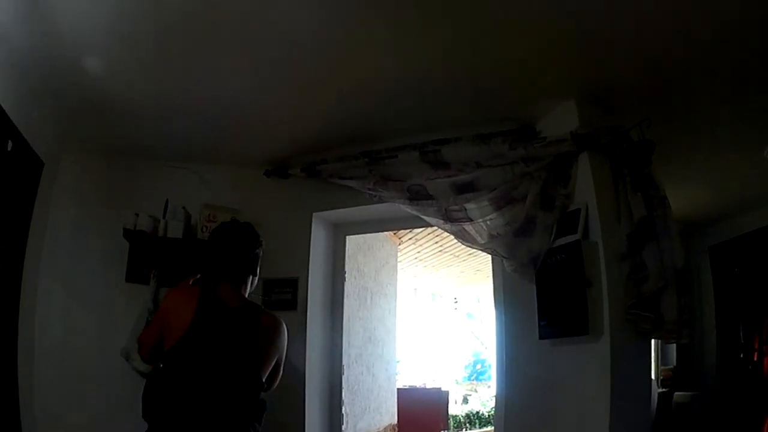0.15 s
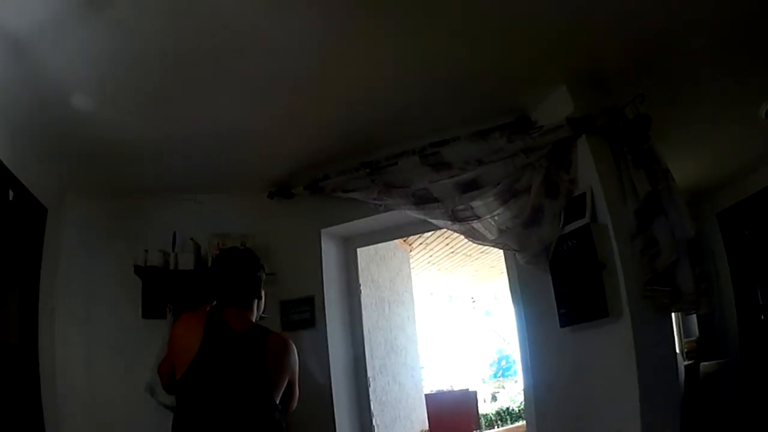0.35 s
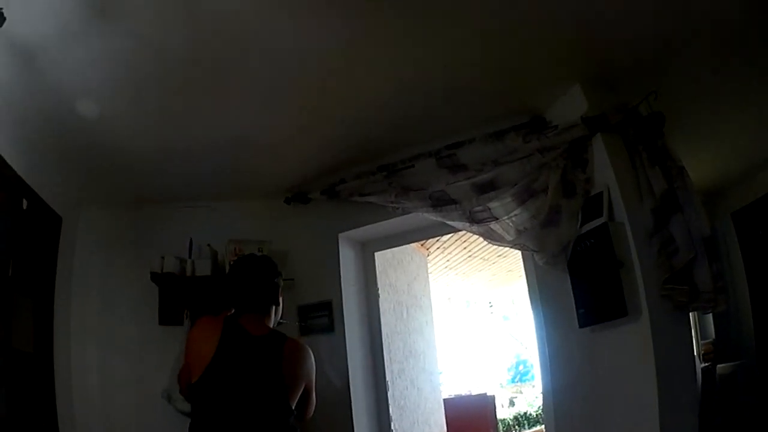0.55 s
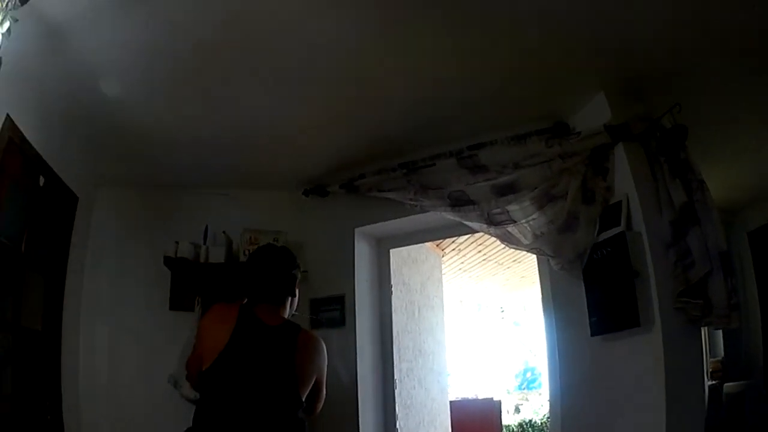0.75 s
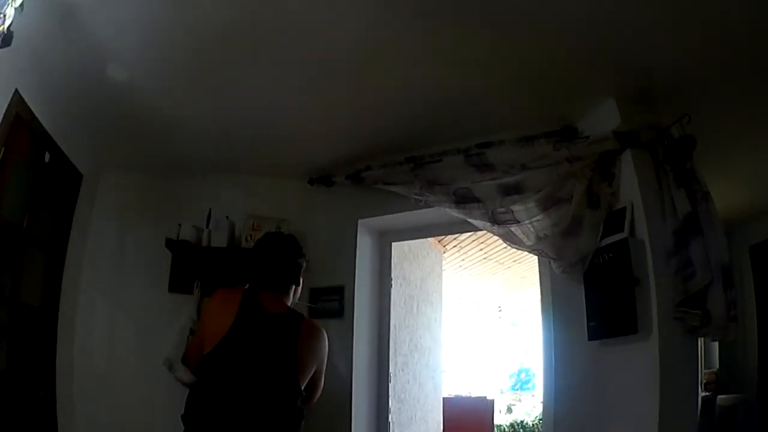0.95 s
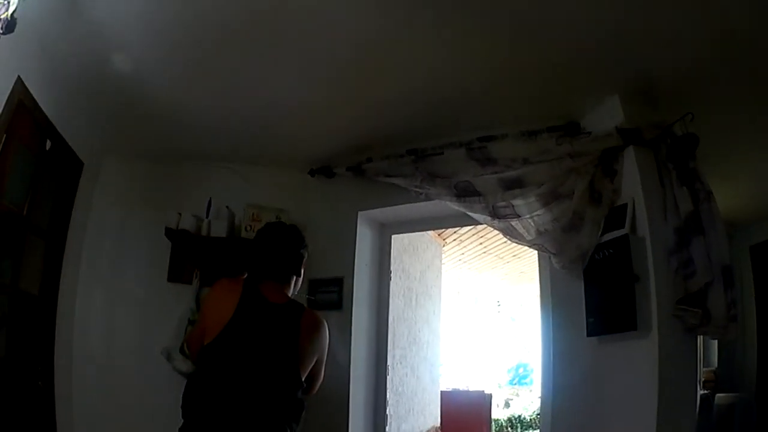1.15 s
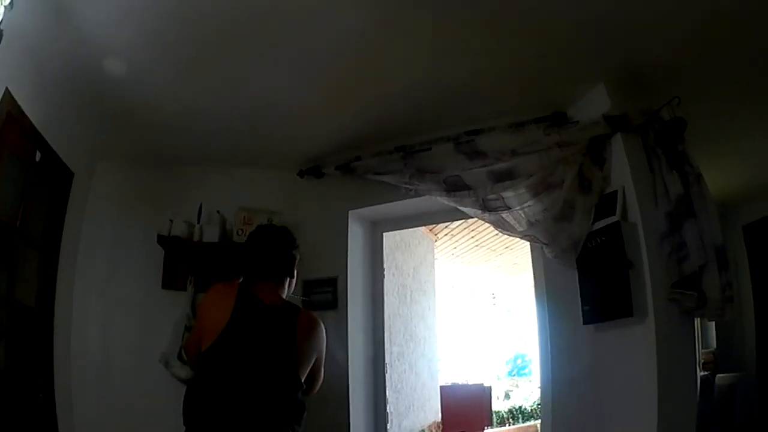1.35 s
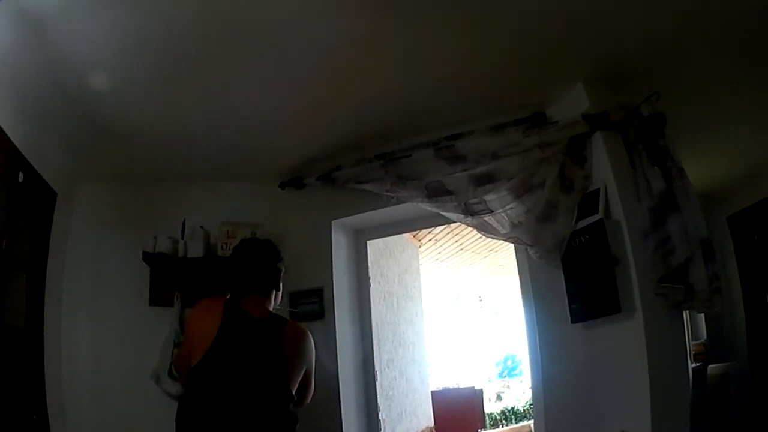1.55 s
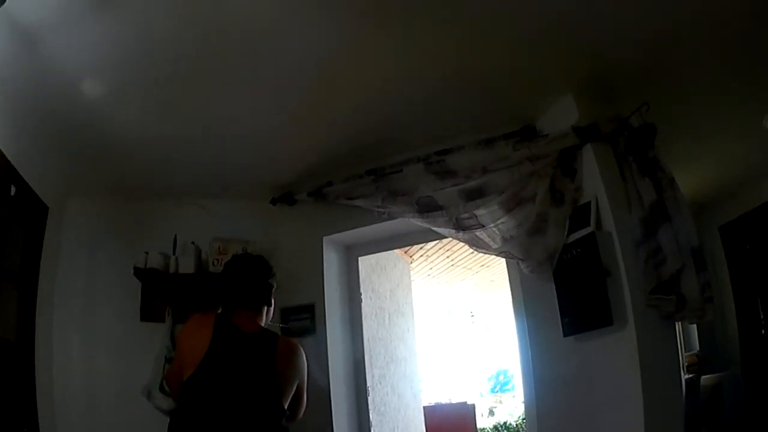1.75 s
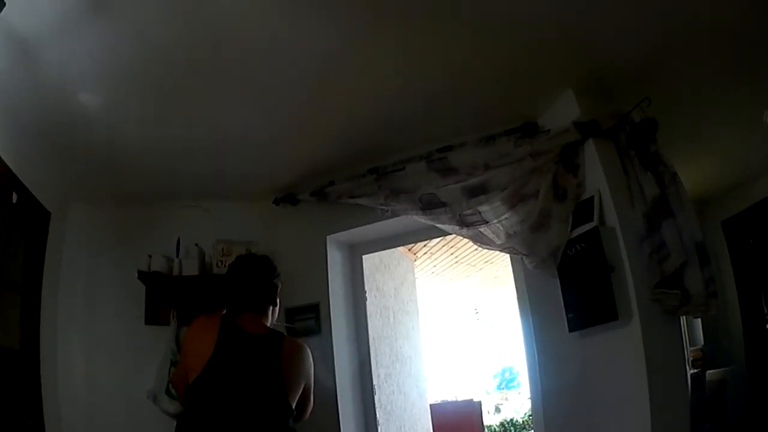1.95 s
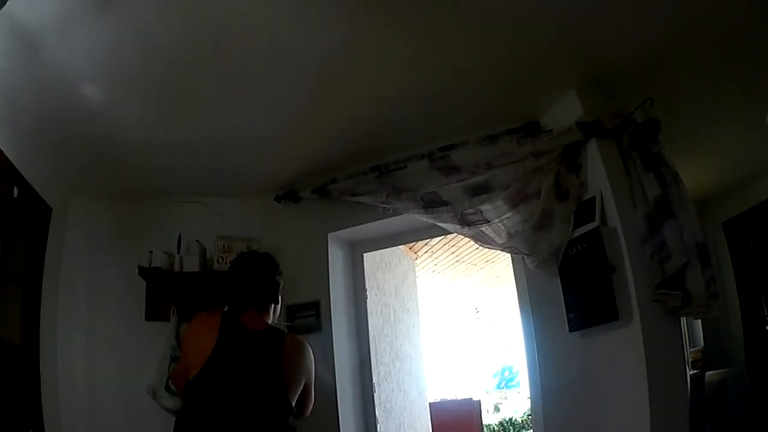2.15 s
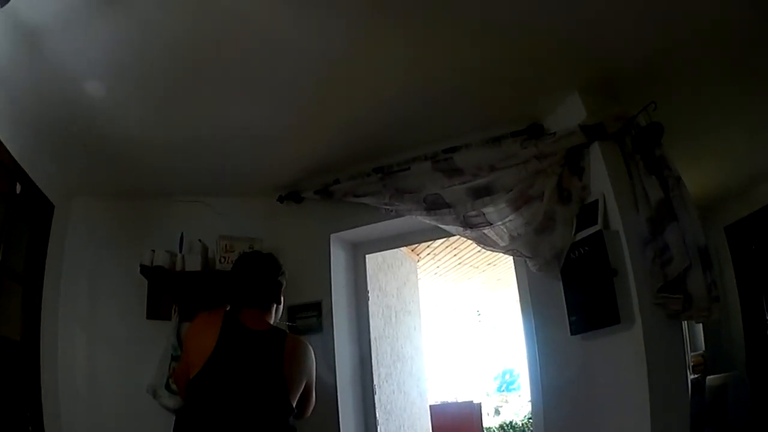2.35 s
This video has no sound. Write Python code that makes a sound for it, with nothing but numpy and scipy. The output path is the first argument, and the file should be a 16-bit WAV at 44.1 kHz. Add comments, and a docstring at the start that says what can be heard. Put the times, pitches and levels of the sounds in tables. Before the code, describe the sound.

After half a second of soft outdoor rush through an open door, a hammer drill bites into a masonry wall, hammering in three loud surges with grinding and squealing, close in a bare echoing room.

```python
"""A soft outdoor rush comes through an open door, then a hammer drill bores into a masonry wall in a bare room.
The trigger is squeezed in three surges: the hammer goes from single taps to a rattle and coasts down again.
Each blow is a click that cracks the stone, rings the steel bit and keeps the wall humming.
Gears grind (filtered grit) and whirr (a gliding tone), and the bit squeals (a resonance kept going by noise).
The rush, shaped noise, carries on softly underneath."""
import sys
import numpy as np
from scipy import signal
from scipy.fft import rfft, irfft, next_fast_len
from scipy.io import wavfile
from scipy.ndimage import uniform_filter1d

SR = 44100
rng = np.random.default_rng(int(sys.argv[2]) if len(sys.argv) > 2 else 0)


def store_wav(level_fs):
    """Save 16-bit WAV to argv[1]."""
    pcm = np.round(np.clip(np.atleast_2d(level_fs), -1, 1) * 32767)
    wavfile.write(sys.argv[1], SR, pcm.T.astype(np.int16))


N = 110250  # length in samples: 2.5 s


def from_db(db):
    """Turn decibels into a gain."""
    return 10 ** (np.asarray(db) / 20)


def rms_one(x):
    """Scale a sound to an rms of 1."""
    return x / np.sqrt(np.mean(x ** 2) + 1e-20)


def in_time(rows, **ends):
    """Draw straight lines between the rows of a table to get a value at every sample."""
    return np.interp(np.arange(N) / SR, *np.transpose(rows), **ends)


def at_hz(points, hz):
    """Read a spectrum at any frequency, with straight lines on a log-frequency axis."""
    point_hz, values = np.transpose(points)
    return np.interp(np.log(hz + 1e-3), np.log(point_hz), values)


def colour(x, spectrum):
    """Filter a sound by a spectrum given in dB."""
    size = next_fast_len(N + 8192)  # spare room keeps the end from wrapping to the start
    gain = from_db(at_hz(spectrum, np.fft.rfftfreq(size, 1 / SR)))
    return irfft(rfft(x, size) * gain, size)[..., :N]


def low_pass(x, hz):
    """Gently remove what lies above a frequency."""
    return signal.sosfilt(signal.butter(2, hz, fs=SR, output="sos"), x)


def drift(rate_hz):
    """Make a slow random wander with an rms of 1."""
    settled = low_pass(rng.standard_normal(N + SR), rate_hz)[SR:]
    return rms_one(settled)


def ring(drive, hz, t60):
    """Let a sound set one resonance ringing, dying by 60 dB in t60 seconds; rms 1."""
    radius = from_db(-60 / (t60 * SR))  # how much of the ring survives each sample
    angle = 2 * np.pi * hz / SR
    feedback = [1, -2 * radius * np.cos(angle), radius * radius]
    return rms_one(signal.lfilter([1, 0, -1], feedback, drive + 1e-18))


# How alike the left and right channels are.
# Each row: frequency in Hz, likeness from -1 (opposite) through 0 (unrelated) to 1 (the same).
LEFT_RIGHT_LIKENESS = [(60, 1), (200, 0.92), (620, 0.96), (1360, 0.84), (2970, 0.62), (4200, 0.59),
                       (6500, -0.28), (8500, -0.16), (13000, -.1)]


def diffuse_noise(size):
    """Sound from all around: stereo noise nearly alike in the bass and less so in the treble."""
    mid, side = rfft(rng.standard_normal((2, size)))
    alike = np.clip(at_hz(LEFT_RIGHT_LIKENESS, np.fft.rfftfreq(size, 1 / SR)), -.99, .99)
    return irfft(np.sqrt(1 + alike) * mid + np.sqrt(1 - alike) * side * [[1], [-1]], size)


ROOM_T60_S, TREBLE_T60_S = 0.6, 0.4  # time to die by 60 dB, below and above about 4500 Hz
EARLY_S, EARLY_DB = 0.013, 1  # decay time and extra level of the near reflections
ECHO_RISE_S = 0.0015  # the near reflections take a moment to build up
DIRECT_DB = -9  # direct sound against the echoes


def room_response():
    """Bare walls give direct sound, near reflections, and a tail whose treble dies first."""
    t = np.arange(SR) / SR
    noise = diffuse_noise(SR)
    low = irfft(rfft(noise) / (1 + (np.fft.rfftfreq(SR, 1 / SR) / 4500) ** 4), SR)
    high = noise - low
    tail = low * from_db(-60 * t / ROOM_T60_S) + high * from_db(-60 * t / TREBLE_T60_S)
    near = 1 + from_db(EARLY_DB) * np.exp(-t / EARLY_S)
    echoes = tail * near * (1 - np.exp(-t / ECHO_RISE_S))
    direct = from_db(DIRECT_DB) * (t == 0)
    return echoes / np.sqrt(np.sum(echoes ** 2) / 2) + direct


def in_room(x):
    """Play a sound in the room by convolving it with fresh echoes; rms 1."""
    return rms_one(signal.fftconvolve(np.atleast_2d(x), room_response(), axes=1)[:, :N])


# Tone of the outdoor rush. Each row: frequency in Hz, relative strength in dB.
OUTDOORS_COLOUR = [(25, 0), (60, -5), (100, -12.5), (160, -7.5), (280, -6), (450, -6), (800, -7.5),
                   (950, -2.5), (1200, -3.5), (2000, -13), (3500, -20), (5500, -31), (7200, -28.5),
                   (8200, -36), (11000, -40), (14000, -58.5)]
# Rise and fall of the outdoor rush. Each row: time in seconds, relative level in dB.
OUTDOORS_SWELL = [(0.0, -51), (0.306, -49), (0.54, -49.5)]
OUTDOORS_DB = 7  # added to the whole swell


def outdoors():
    """Shaped noise makes a soft rush from beyond the open door."""
    rush = rms_one(colour(diffuse_noise(N), OUTDOORS_COLOUR))
    return from_db(OUTDOORS_DB + in_time(OUTDOORS_SWELL)) * rush


# Loudness of the grinding and whirr. Each row: time in seconds, relative level in dB.
GRIND_LEVEL = [(0.55, -60), (0.56, -48.5), (0.652, -24), (0.734, -15.5), (0.94, -15.5), (1.19, -27.5),
               (1.358, -11), (1.37, -14), (1.488, -16), (1.532, -18), (1.56, -14.5), (1.836, -25),
               (1.94, -15.5), (2.292, -15), (2.444, -22), (2.5, -22.5)]


def grind_level_db():
    """The grinding and the whirr share one loudness curve, silent before the start."""
    return in_time(GRIND_LEVEL, left=-120)


WHIRR_CYCLES_PER_BLOW, WHIRR_DB = 89, -12.5  # the level is added to the shared curve
WANDER_CYCLES, WANDER_HZ = 0.63, 31.1  # unsteadiness of the tone, and the top of its rates


def whirr(turns):
    """Gears make a rough tone that glides with the speed and smears in the room."""
    cycles = WHIRR_CYCLES_PER_BLOW * turns + WANDER_CYCLES * drift(WANDER_HZ)
    tone = np.sin(2 * np.pi * cycles)
    return from_db(WHIRR_DB + grind_level_db()) * in_room(tone * (turns > 0))


GRIT_PER_S, GRIT_SPREAD_DB = 1500, 3


def grit():
    """Grinding is made of dense tiny contacts of uneven size."""
    contacts = rng.random(N) < GRIT_PER_S / SR
    return contacts * rng.standard_normal(N) * from_db(GRIT_SPREAD_DB * rng.standard_normal(N))


# Tone of the grinding. Each row: frequency in Hz, relative strength in dB.
GRIND_TONE = [(30, -31), (110, -23.5), (330, -19), (480, -12.5), (660, -3), (800, -3.5), (1050, -8),
              (1700, 0.5), (2250, 2), (3000, -0.5), (3900, -0.5), (5600, -11.5), (7200, -17), (9000, -23),
              (12300, -29), (13000, -39)]
GRIND_DB = -1  # added to the shared curve
GRIND_PULSE = 0.065  # depth of the throb at each blow
HOUSING_HZ, HOUSING_FOLLOWS = 1180, 0.8  # top of the growl, and its share of the level swings
SPIN_UP_TURNS = 0.26  # the grinding sets in over the first part of a turn


def grinding(turns, count=3):
    """Several layers of the same throbbing grit, each with its own echoes, over a steadier low growl."""
    throb = 1 + GRIND_PULSE * np.cos(2 * np.pi * turns)
    layers = sum(in_room(grit() * throb) for _ in range(count))
    sound = rms_one(colour(layers, GRIND_TONE))
    # Filtering forwards, then backwards, leaves the growl without delay.
    growl = low_pass(low_pass(sound, HOUSING_HZ)[:, ::-1], HOUSING_HZ)[:, ::-1]
    level_db = grind_level_db()
    growl_db = level_db.max() + HOUSING_FOLLOWS * (level_db - level_db.max())
    spin_up = np.clip(turns / SPIN_UP_TURNS, 0, 1) ** .5
    mix = (sound - growl) * from_db(level_db) + growl * from_db(growl_db)
    return from_db(GRIND_DB) * spin_up * mix


# Loudness of the bit's squeal as it rubs in the hole. Each row: time in seconds, level in dB.
SQUEAL_SWELL = [(.6, -80), (.76, -24.5), (.85, -22), (1.0, -36), (1.2, -58), (1.35, -22.5), (1.48, -18.5),
                (1.6, -41), (1.85, -52), (2.0, -22), (2.17, -21), (2.27, -20), (2.36, -45), (2.5, -32)]
SQUEAL_HZ, SQUEAL_T60_S = 3885, 0.019  # the ring time is split over two passes
SQUEAL_THROB = 0.46  # depth of the flutter


def squeal(turns):
    """Rubbing noise keeps a strong mode of the bit ringing, fluttering once per blow."""
    rub = diffuse_noise(N) * (1 + SQUEAL_THROB * np.sin(2 * np.pi * turns))
    once = ring(rub, SQUEAL_HZ, SQUEAL_T60_S / 2)
    twice = ring(once, SQUEAL_HZ, SQUEAL_T60_S / 2)
    return from_db(in_time(SQUEAL_SWELL)) * twice


def blow_times(turns):
    """The hammer strikes once per turn; gives the sample positions."""
    return np.flatnonzero(np.diff(np.floor(turns)) > 0)


def strikes(at, db, spread_db):
    """Each blow is a click, randomly a little stronger or weaker."""
    clicks = np.zeros(N)
    clicks[at] = from_db(db + spread_db * rng.standard_normal(len(at)))
    return clicks


CHATTER_S, CHATTER_DB = 0.0038, -11  # decay time, and level against the click


def chatter(clicks):
    """The bit rebounds and stone crumbles: a short burst of fading noise after each blow."""
    fading = signal.lfilter([1], [1, -np.exp(-1 / (CHATTER_S * SR))], clicks + 1e-18)
    return clicks + from_db(CHATTER_DB) * fading * rng.standard_normal(N)


def even(x):
    """Level out a sound by dividing it by its own short-term loudness."""
    return x / np.sqrt(np.abs(uniform_filter1d(x ** 2, size=3000)) + 1e-2)


RING_SPREAD_DB = 3.5  # random spread of the blows that ring the wall and bit

# Ringing of the wall. Each row: frequency in Hz, relative level in dB, time to die by 60 dB in seconds.
WALL_RINGING = [(117.7, -18, 0.19), (149.4, -13.5, 0.49), (211.2, -6.5, 0.47), (214.4, -1.5, 0.29),
                (234.3, -9, 0.45), (284, -15, 0.46), (340.5, -14, .3), (379.3, -13.5, 0.24),
                (481, -7, 0.75)]
# Loudness of the wall's hum. Each row: time in seconds, relative level in dB.
WALL_SWELL = [(.55, -80), (.65, -60.5), (.72, -34), (.9, -40), (1.02, -41.5), (1.12, -47.5), (1.22, -45),
              (1.28, -48), (1.34, -35), (1.58, -33.5), (1.68, -37.5), (1.82, -53), (1.92, -34), (2.07, -36),
              (2.3, -33.5), (2.5, -43)]


def wall(turns):
    """Blows keep the wall's low modes humming, each mode held nearly even."""
    at = blow_times(turns)
    hum = np.zeros(N)
    for hz, level_db, t60 in WALL_RINGING:
        clicks = chatter(strikes(at, 0, RING_SPREAD_DB))
        hum += from_db(level_db) * even(ring(clicks, hz, t60))
    return from_db(in_time(WALL_SWELL)) * hum


# Strength of the blows. Each row: time in seconds, relative strength in dB.
BLOW_FORCE = [(.637, -27.5), (.686, -7), (.72, 1.5), (.75, 1), (.82, -5.5), (.91, -3), (1.04, -23.5),
              (1.1, -16.5), (1.19, -20), (1.25, -11.5), (1.33, -0.5), (1.39, -1.5), (1.48, -2.5),
              (1.62, -8.5), (1.7, -16.5), (1.78, -20.5), (1.84, -18), (1.89, -6), (1.95, 1), (2.0, -3),
              (2.15, -4), (2.26, -6), (2.41, -22), (2.49, -11.5)]
# Tone of the cracking stone. Each row: frequency in Hz, relative strength in dB.
CRACK_COLOUR = [(30, -65), (100, -46), (400, -37), (1000, -6.5), (2200, -6), (3900, 2), (5700, -7.5),
                (7200, -3), (9200, -8), (12300, -12), (12700, -14.5)]
# Ringing of the steel bit and chuck. Each row: frequency in Hz, relative level in dB,
# time to die by 60 dB in seconds, left minus right in dB before the room.
BIT_RINGING = [(2228, 0.5, 0.027, 1.5), (3880, 0.5, 0.033, 4), (3710, -2, 0.022, 11),
               (5130, -5.5, 0.037, 5), (5920, -20, 0.017, -10), (6563, -16, 0.012, -36.5),
               (7300, -5, 0.017, -13.5), (8290, -7, 0.045, 8), (9800, -10, 0.034, 5.5),
               (10000, -23, 0.019, -2), (10670, -5, .02, -4.5), (11976, -13.5, .025, 17),
               (12100, -20, .025, 6)]
CRACK_DB, BIT_DB = -21.5, -23.5  # rms levels
BLOW_SPREAD_DB = 4.5  # random spread of the cracks


def hammer(turns):
    """Each blow cracks the stone and sets the steel bit's modes ringing."""
    at = blow_times(turns)
    force_db = in_time(BLOW_FORCE)[at]
    crack = colour(chatter(strikes(at, force_db, BLOW_SPREAD_DB)), CRACK_COLOUR)
    bit = np.zeros((2, N))
    for hz, level_db, t60, left_minus_right_db in BIT_RINGING:
        sides_db = level_db + np.array([[.5], [-.5]]) * left_minus_right_db
        clicks = chatter(strikes(at, force_db, RING_SPREAD_DB))
        bit += from_db(sides_db) * ring(clicks, hz, t60)
    return from_db(CRACK_DB) * in_room(crack) + from_db(BIT_DB) * in_room(bit)


# Speed of the hammer. Each row: time in seconds, blows per second.
HAMMER_SPEED = [(0.55, 0.0), (0.592, 11.68), (0.756, 38.96), (0.831, 37.7), (0.983, 22.24), (1.172, 8.99),
                (1.271, 24.79), (1.343, 36.74), (1.46, 39.37), (1.608, 23.6), (1.826, 12.91), (1.92, 33.77),
                (1.964, 41.46), (2.107, 43.49), (2.301, 25.47), (2.452, 15.53), (2.5, 19.0)]


def scene():
    """The hammer's speed adds up to turns, which drive every part of the drill."""
    turns = np.cumsum(in_time(HAMMER_SPEED, left=0)) / SR
    background = outdoors()
    motor = whirr(turns) + grinding(turns)
    return background + motor + squeal(turns) + wall(turns) + hammer(turns)


LOW_CUT_HZ, CUTOFF_HZ = 117, 13000  # deep bass and top treble are removed


def record(dry):
    """Clip the highest peaks, then roll off the deep bass and cut the top."""
    clipped = np.clip(dry, -1, 1)
    lean = signal.sosfilt(signal.butter(2, LOW_CUT_HZ, "high", fs=SR, output="sos"), clipped)
    return signal.sosfilt(signal.ellip(10, .2, 80, CUTOFF_HZ, fs=SR, output="sos"), lean)


dry = scene()
out = record(dry)
store_wav(out)
```